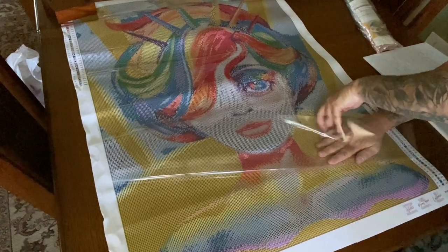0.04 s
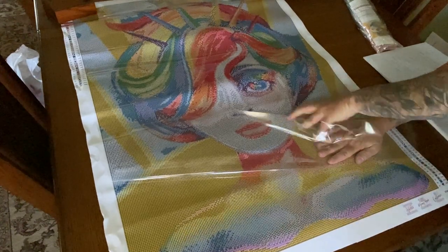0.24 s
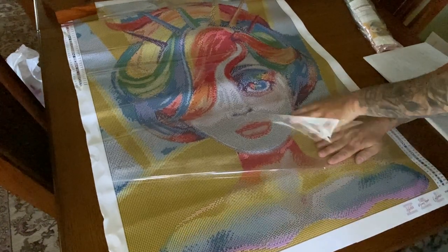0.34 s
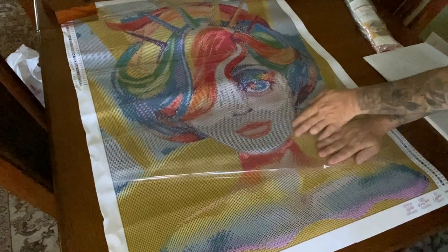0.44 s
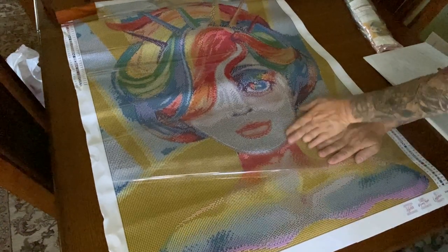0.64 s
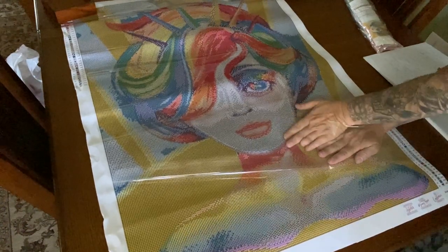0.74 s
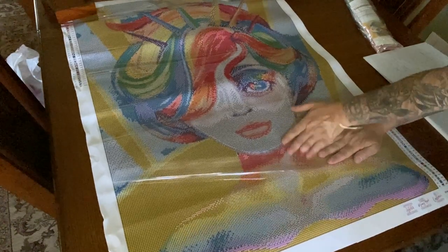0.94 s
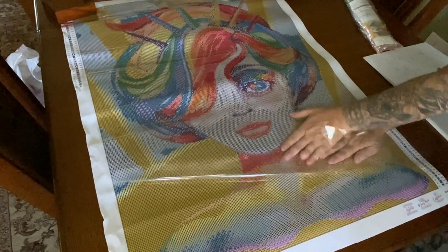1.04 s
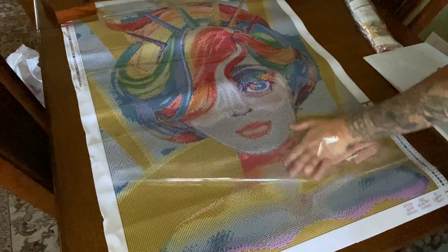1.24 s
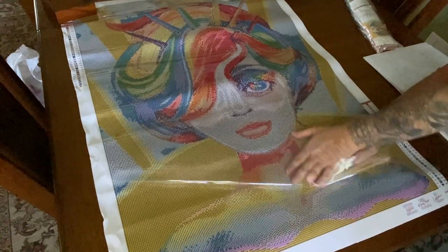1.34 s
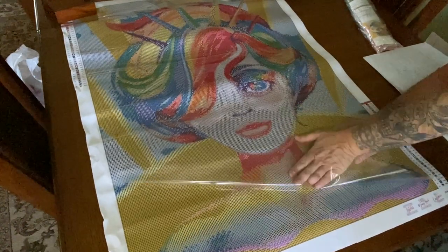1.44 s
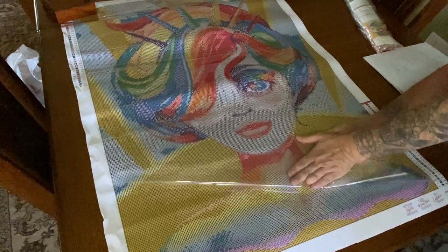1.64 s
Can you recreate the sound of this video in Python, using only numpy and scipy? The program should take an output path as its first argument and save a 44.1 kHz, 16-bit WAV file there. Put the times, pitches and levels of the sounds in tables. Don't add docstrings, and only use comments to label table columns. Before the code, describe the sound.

Thick plastic film crinkles with sharp snaps as hands lift it off a canvas, eases briefly, then crackles again in a denser burst as it is pressed onto a wooden table; close phone microphone, small quiet room.

```python
import sys
import numpy as np
from scipy import signal
from scipy.fft import rfft, irfft, next_fast_len
from scipy.io import wavfile
from scipy.ndimage import uniform_filter1d, minimum_filter1d

SR = 44100
rng = np.random.default_rng(int(sys.argv[2]) if len(sys.argv) > 2 else 0)


def gain_from_db(level_db):
    decades = np.asarray(level_db, float) / 20
    return 10 ** decades


def generate_wav(signal):
    frames = np.transpose(np.atleast_2d(signal))
    scaled = np.clip(frames, -1, 1) * 32767
    pcm = np.round(scaled).astype(np.int16)
    wavfile.write(sys.argv[1], SR, pcm)


N = 74970

# start_s, peak_db,
# film_pitch_hz, crack_db, push_db
PEEL_SNAPS = [(.0598, -68.5, 2890, -1, -16), (.0757, -40.5, 1890, 18, 3), (.094, -44.5, 1990, -13, -1.5),
              (.154, -41, 1400, 19.5, 4.5), (.168, -50, 1390, 18, -10), (.196, -45.5, 1480, 8, 4),
              (.2199, -40.5, 1830, -12, -4), (.2374, -31, 1760, 0, -4), (.2425, -25, 1340, 11, -32),
              (.2463, -23, 1780, 15, 0), (.2883, -27, 3540, -2, -2.5), (.298, -29, 1100, -4, 2),
              (.3092, -12, 1646, 10, -4.5), (.3185, -22.5, 1750, -8, -3), (.326, -23, 2910, 2, -1.5),
              (.391, -14, 2340, 7, -7.5), (.4444, -32, 1470, -10, -21), (.4933, -24.5, 1840, 1.5, -36),
              (.5157, -42.5, 1640, 18.5, -29), (.577, -37.5, 1470, 11, -27), (.5856, -14, 1650, 6, -58),
              (.6144, -31, 1410, 6, -33), (.6644, -30.5, 1680, -20, -33), (.6833, -27, 4000, 7.5, -37),
              (.7223, -12.5, 1830, 5.5, -39)]
# start_s, peak_db, film_pitch_hz, crack_db, push_db
PRESS_SNAPS = [(.902, -45.5, 1570, -7, -20), (.9308, -21, 1630, 7, -59), (.9952, -28, 1520, -5, -27),
               (1.0251, -10.5, 1760, 6.5, -17), (1.032, -24, 1670, 11.5, -33), (1.042, -22, 1840, -1, -22),
               (1.0465, -27, 1470, -2, -13), (1.0876, -28, 1560, -19, -1), (1.186, -33.5, 1240, -2, -4),
               (1.1967, -9, 1470, 8, -2.5), (1.2038, -41, 1400, 29, -24), (1.217, -26.5, 1500, 11, -6),
               (1.2526, -24, 1270, -24, 6), (1.269, -22.5, 1530, 3, -28), (1.2801, -20, 3260, 12.5, -2),
               (1.2852, -21, 1450, 4, -37), (1.298, -16.5, 2820, -11, 1), (1.303, -16, 3400, -25, -3),
               (1.3155, -17, 1310, 2, 3.5), (1.3205, -11, 2800, 8.5, -6.5), (1.3381, -31.5, 2420, 20, -24),
               (1.3841, -20.5, 1490, 7, 6.5), (1.4785, -41, 1750, -29, 2), (1.523, -27, 1550, -5, 1),
               (1.5715, -24.5, 1610, -28.5, -1), (1.6492, -52.5, 1580, -18, -22),
               (1.6819, -34.5, 1550, -46, -9)]
# time_s, crackle_db, glue_over_crackle_db
HAND_EFFORT = [(0, -93, -8), (.07, -63, 14), (.13, -62, 9.5), (.22, -57.5, 2), (.26, -32, -8.5),
               (.4, -31, -16), (.55, -40, -11.5), (.67, -34.5, -17), (.76, -60, 0.5), (.88, -48.5, -12.5),
               (1.0, -32.5, -13.5), (1.09, -36.5, -32), (1.17, -46.5, -12), (1.25, -32, -19),
               (1.31, -16, -14), (1.41, -31, -17), (1.5, -37, -44), (1.62, -51, -34)]
# start_s, level_db, main_pitch_hz
HAND_NUDGES = [(0.082, -41.5, 277), (0.154, -37, 249.5), (0.187, -42, 262), (.242, -29.5, 290),
               (0.311, -39, 288), (0.389, -55, 277), (0.618, -62, 277), (0.669, -62, 277),
               (0.725, -49, 277), (.94, -47, 200), (1.041, -45, 277), (1.202, -40, 390),
               (1.241, -40.5, 397), (1.268, -37.5, 274), (1.318, -27.5, 285.3), (1.382, -40, 288),
               (1.42, -37.5, 285), (1.519, -40, 305), (1.572, -70, 310)]
# frequency_hz, level_db
CRACK_COLOUR = [(700, -16.5), (1500, -3), (3000, 1), (6000, -0.05), (8500, -3), (10500, -5), (16500, -16)]
# multiple_of_film_pitch, level_db
FILM_OVERTONES = [(.6, -12.5), (2.1, -8), (3.7, -12.5)]
# frequency_hz, width_hz, level_db
PUSH_MODES = [(420, 310, -10.5), (606, 46, 5.5), (1040, 380, 1.5)]
# frequency_hz, level_db_per_hz
CRACKLE_COLOUR = [(150, -47), (500, -0.5), (1400, 12.5), (3500, 3), (8000, -10), (10000, -38),
                  (15000, -32.5), (17000, -26)]
# frequency_hz, level_db_per_hz
GLUE_COLOUR = [(1000, -6), (2500, -5), (5000, -5), (8000, -9), (10000, -4.5), (12500, -9), (15000, -6),
               (16500, -27)]
# frequency_hz, level_db, t60_s
TABLE_MODES = [(120, -10.5, 0.15), (200, -4, 0.062), (277, 0.5, 0.13), (348, 2, 0.062)]
# frequency_hz, t60_s
ROOM_RING = [(200, 0.57), (800, 0.21), (2100, 0.32), (5500, 0.33), (12000, 0.38)]
# frequency_hz, level_db
FAR_COLOUR = [(300, 4), (1000, 6), (8600, -2.5), (10000, -3.5), (15000, -22), (16000, -22)]
# frequency_hz, level_db_per_hz
HUSH_COLOUR = [(20, -21), (45, -5), (100, 12.5), (160, -2), (300, -2.5), (730, -18), (3000, -6.5),
               (6000, -15.5), (16000, -46)]
# frequency_hz, likeness_0_to_1
LIKENESS = [(60, 0.56), (300, 0.79), (800, 0.31), (2000, 0.0496), (15000, 0.013)]
# frequency_hz, lead_radians
LEFT_LEAD = [(1000, 1.49), (2500, -0.87), (4000, -1.36), (5300, -1.87), (6800, -1.5), (8500, -0.44)]
# frequency_hz, level_db
LEFT_LEVEL = [(200, -4), (700, -4), (1500, -1.2), (3000, .1), (6000, -.8)]
# frequency_hz, level_db
PORT_COLOUR = [(20, -32), (45, -15), (300, -9.5), (8400, -0.35), (16000, -2), (17200, -73)]

BREAK_SPIKE, BREAK_DELAY_S, BREAK_RISE_S = 5.08, 0.00028, 0.00013
CREEP_S, CREEP_DB = .003, -30
BURST_S, SETTLE_T60_S, RATTLE_T60_S = 0.0013, 0.012, .035
FILM_DB, RATTLE_DB = 3, -4
FILM_BROAD = 0.56
DULLING = 0.8
GRAINS, GRAIN_T60_S, GRAIN_DB, GRAIN_SPREAD_DB = 1100, .008, -11, 5
GLUE_BRIGHTEN, GLUE_TOP_HZ = 0.68, 9100
NUDGE_RISE_S = .006
ROOM_DB, ROOM_START_S = -6.5, 0.0042
WALL_DB, WALL_S, WALL_SPREAD_S = -12, .0205, .0028
HUSH_DB = -59.5
MONO_HZ, IN_STEP_HZ, TURN_HZ = (7800, 8800), 6900, 5200
SPARE_HZ, SPARE_DB, STEADY_DB, STEADY_TOP_HZ = 8600, -6.5, 6, 15300


def creases():
    direct, wet = np.zeros((2, N + SR)), np.zeros((2, N + SR))
    for start_s, peak_db, film_hz, crack_db, push_db in list(PEEL_SNAPS) + list(PRESS_SNAPS):
        sound, lead = snap(film_hz, crack_db, push_db)
        at = round(start_s * SR) - lead
        place = rng.integers(-1, 2)
        direct[:, at:at + len(sound)] += gain_from_db(peak_db) * np.array([np.roll(sound, place), sound])
        answer = signal.fftconvolve(gain_from_db(peak_db) * scattered(sound)[None], room(), axes=1)
        wet[:, at + lead - 64:][:, :answer.shape[1]] += answer
    return ports(direct[:, :N]) + wet[:, :N]


def snap(film_hz, crack_db, push_db):
    lead = 700
    clock = (np.arange(SR // 10) - lead) / SR - BREAK_DELAY_S
    weak_db = min(crack_db, 0)

    def edge(f):
        return gain_from_db(along(CRACK_COLOUR, f) + DULLING * weak_db * np.log2(1 + f / 4000))

    def film_body(f):
        modes = [(0.95, 0.014)] + list(FILM_OVERTONES)
        return sum(gain_from_db(db + weak_db * (k > 1)) * peak(f, k * film_hz, FILM_BROAD * film_hz) ** 2
                   for k, db in modes)

    def loose_film(f):
        return gain_from_db(crack_db - FILM_DB + 0.5) * edge(f) + peak(f, film_hz, 1.34 * film_hz) ** 2

    def wood(f):
        return sum((-1) ** k * gain_from_db(db) * peak(f, hz, width_hz)
                   for k, (hz, width_hz, db) in enumerate(PUSH_MODES))

    def part(t60_s, response):
        sound = filtered(burst(clock, lead, t60_s), response)
        return sound / np.abs(sound).max()

    crack = part(SETTLE_T60_S, edge)
    film = part(SETTLE_T60_S, film_body)
    rattle = part(RATTLE_T60_S, loose_film)
    push = part(SETTLE_T60_S, wood)
    mix = gain_from_db(crack_db) * crack + gain_from_db(FILM_DB) * film + gain_from_db(RATTLE_DB) * rattle + gain_from_db(push_db) * push
    return mix, lead


def burst(clock, lead, t60_s):
    t = np.clip(clock, 0, None)
    spike = BREAK_SPIKE * (np.arange(len(t)) == lead + 40)
    creep = gain_from_db(CREEP_DB) * np.exp(np.clip(clock, None, 0) / CREEP_S) * (clock < 0)
    fall = gain_from_db(-60 * np.clip(t - BURST_S, 0, None) / t60_s)
    rise = 1 - np.exp(-t / BREAK_RISE_S)
    return even(spike + rng.standard_normal(len(t)) * (creep + fall * rise))


def even(x):
    z = rfft(x)
    power = np.abs(uniform_filter1d(np.abs(z) ** 2, size=80))
    return irfft(z / np.sqrt(power + 1e-12), len(x))


def scattered(x):
    power = uniform_filter1d(np.abs(rfft(x)) ** 2, size=60)
    click = irfft(np.sqrt(np.abs(power)), len(x))
    return np.roll(click, 64)[:512]


def crackle():
    draw = rng.random((GRAINS, 2))
    sizes = gain_from_db(-GRAIN_SPREAD_DB * np.log(draw[:, 1] + 0.024))
    kicks = np.bincount((draw[:, 0] * N).astype(int), sizes, N)
    fade = gain_from_db(-60 * np.arange(SR // 50) / SR / GRAIN_T60_S)
    grains = signal.fftconvolve(kicks, fade)[:N] * rng.standard_normal(N)

    s, crackle_db, glue_db = np.transpose(HAND_EFFORT)
    time = np.arange(N) / SR
    hiss = unit(filtered(diffuse(N), lambda f: gain_from_db(along(GLUE_COLOUR, f))))
    treble = filtered(hiss, lambda f: 1 / (1 + (GLUE_TOP_HZ / (f + 1)) ** 4))
    brighten = gain_from_db(GLUE_BRIGHTEN * np.interp(time, s, glue_db)) - 1
    glue = gain_from_db(np.interp(time, s, crackle_db + glue_db)) * (hiss + brighten * treble)

    pops = unit(filtered(grains, lambda f: gain_from_db(along(CRACKLE_COLOUR, f))))
    pops = gain_from_db(np.interp(time, s, crackle_db) + GRAIN_DB) * pops
    return glue + ports(pops) + signal.fftconvolve(pops[None], room(), axes=1)[:, :N]


def table():
    out, t = np.zeros(N + SR), np.arange(SR // 3) / SR
    for start_s, nudge_db, pitch_hz in HAND_NUDGES:
        shift = pitch_hz / TABLE_MODES[2][0]
        ring = 0
        for hz, level_db, t60_s in TABLE_MODES:
            fade = gain_from_db(level_db + rng.normal(0, 1) - 60 * t / t60_s)
            ring = ring + fade * np.sin(2 * np.pi * hz * shift * t)
        out[round(start_s * SR):][:len(t)] += gain_from_db(nudge_db) * ring * (1 - np.exp(-t / NUDGE_RISE_S))
    return out[:N] * gain_from_db([[-2.5], [2.2]])


def room():
    size = SR // 2
    hz, t, z = signal.stft(diffuse(size), SR, nperseg=256)
    fade = gain_from_db(-60 * t / along(ROOM_RING, hz)[:, None])
    tail = signal.istft(z * fade, SR, nperseg=256)[1][:, :size]
    t = np.arange(size) / SR
    tail = tail * (1 - np.exp(-(t / ROOM_START_S) ** 2))
    wall = rng.standard_normal(size) * np.exp(-((t - WALL_S) / WALL_SPREAD_S) ** 2)
    tail = gain_from_db(ROOM_DB) * tail / np.linalg.norm(tail[0])
    echo = gain_from_db(WALL_DB) * ports(wall) / np.linalg.norm(wall)
    return filtered(tail + echo, lambda f: gain_from_db(along(FAR_COLOUR, f)))


def hush():
    return gain_from_db(HUSH_DB) * unit(filtered(diffuse(N), lambda f: gain_from_db(along(HUSH_COLOUR, f))))


def diffuse(size):
    def blend(hz):
        turn = np.arccos(np.clip(along(LIKENESS, hz), -1, 1)) / 2
        return np.array([np.cos(turn), np.sin(turn)])

    mid, side = filtered(rng.standard_normal((2, size)), blend)
    return np.array([mid + side, mid - side])


def ports(x):
    side = np.array([[.5], [-.5]])

    def response(hz):
        return gain_from_db(side * along(LEFT_LEVEL, hz)) * np.exp(1j * side * along(LEFT_LEAD, hz))

    return filtered(x * np.ones((2, 1)), response)


def unit(x):
    return x / np.sqrt(np.mean(x ** 2) + 1e-20)


def along(points, hz):
    f, v = np.transpose(points)
    return np.interp(np.log(hz + 1), np.log(f + 1), v)


def filtered(x, response):
    n = x.shape[-1]
    m = next_fast_len(n + 4096)
    return irfft(rfft(x, m) * response(np.fft.rfftfreq(m, 1 / SR)), m)[..., :n]


def peak(f, hz, width_hz):
    return 1j * f * width_hz / (hz * hz - f * f + 1j * f * width_hz)


def scene():
    return creases() + crackle() + table() + hush()


def thrift(pair):
    hz, _, z = signal.stft(np.array([pair[0] + pair[1], pair[0] - pair[1]]) / 2, SR, nperseg=512)
    power = np.abs(uniform_filter1d(np.abs(z) ** 2, size=8, axis=1))
    loud = power[:, hz > SPARE_HZ].sum((0, 1))
    steady = loud < gain_from_db(2 * STEADY_DB) * np.roll(minimum_filter1d(loud, size=5), 1)
    slow = uniform_filter1d(power, size=5, axis=2)
    weaker = (slow < gain_from_db(2 * SPARE_DB) * slow[::-1]) & (hz > SPARE_HZ)[:, None]
    muted = (weaker | (hz > STEADY_TOP_HZ)[:, None]) & steady
    mid, side = signal.istft(z * ~muted, SR, nperseg=512)[1][:, :N]
    return np.array([mid + side, mid - side])


def band_limit(x):
    return signal.sosfilt(signal.butter(12, 17150, fs=SR, output="sos"), x)


def record(dry):
    def share(f):
        return np.interp(f, MONO_HZ, [0, 1])

    def slip(f):
        return share(f) * np.exp(-2j * np.pi * (f - IN_STEP_HZ) / TURN_HZ)

    own = filtered(dry[0], lambda f: np.sqrt(1 - share(f) ** 2))
    left = own + filtered(dry[1], slip)
    heard = filtered(np.array([left, dry[1]]), lambda f: gain_from_db(along(PORT_COLOUR, f)))
    return band_limit(thrift(heard))


dry = scene()
out = record(dry)
generate_wav(out)
```